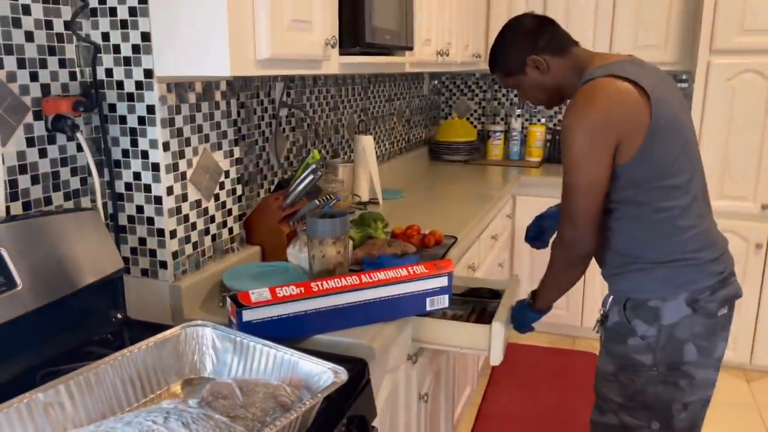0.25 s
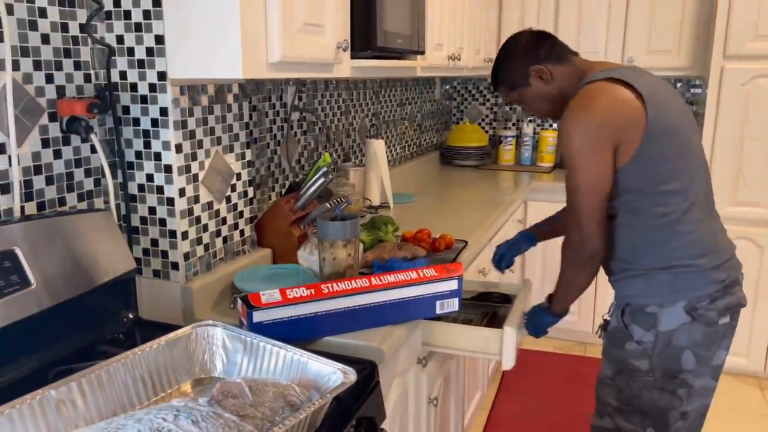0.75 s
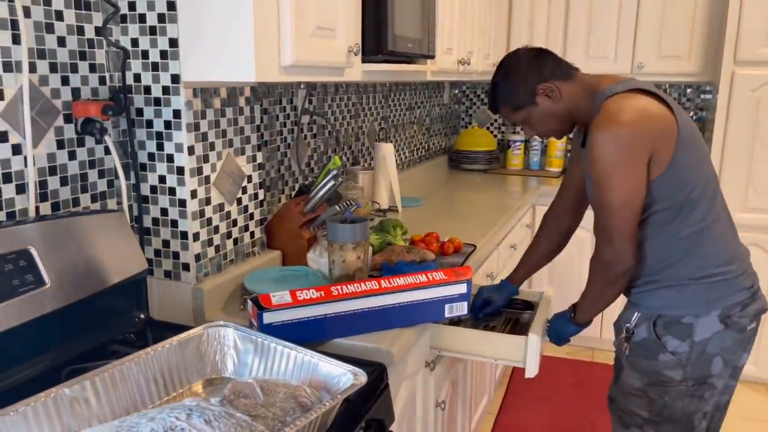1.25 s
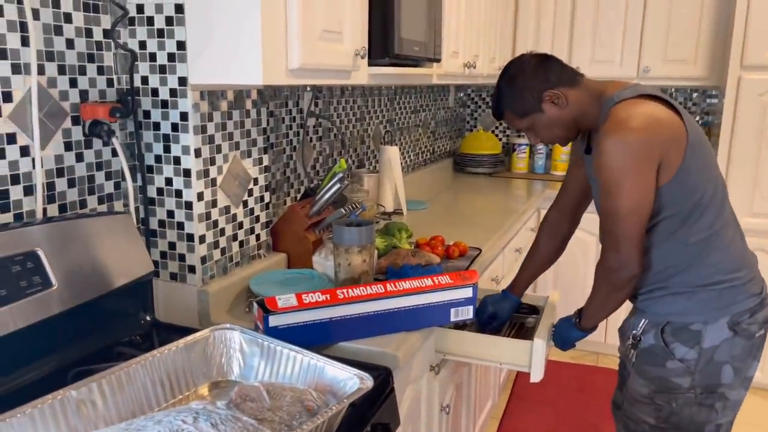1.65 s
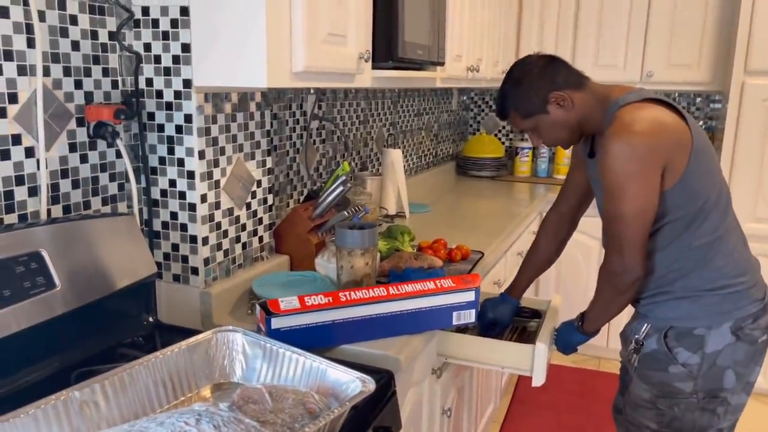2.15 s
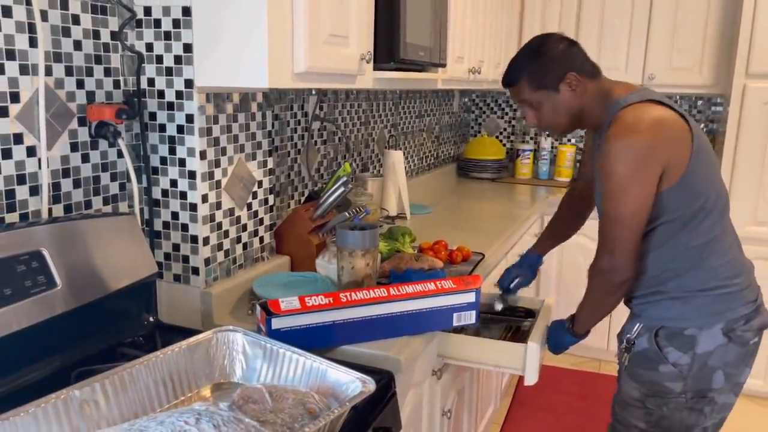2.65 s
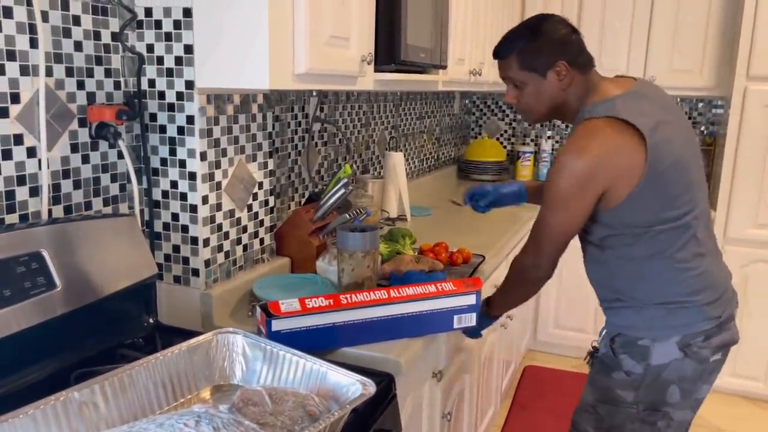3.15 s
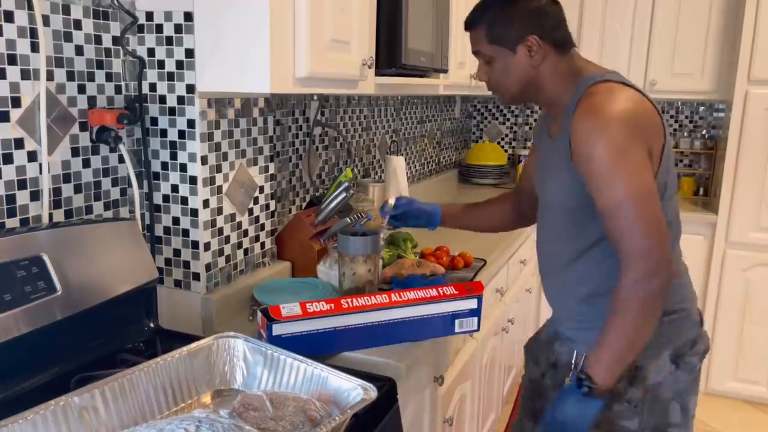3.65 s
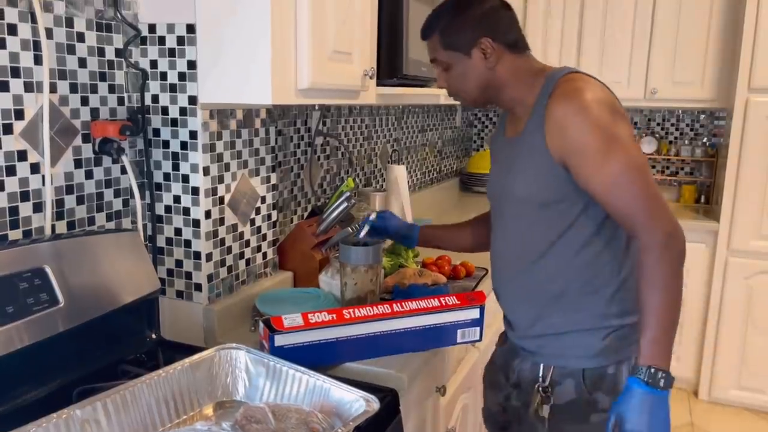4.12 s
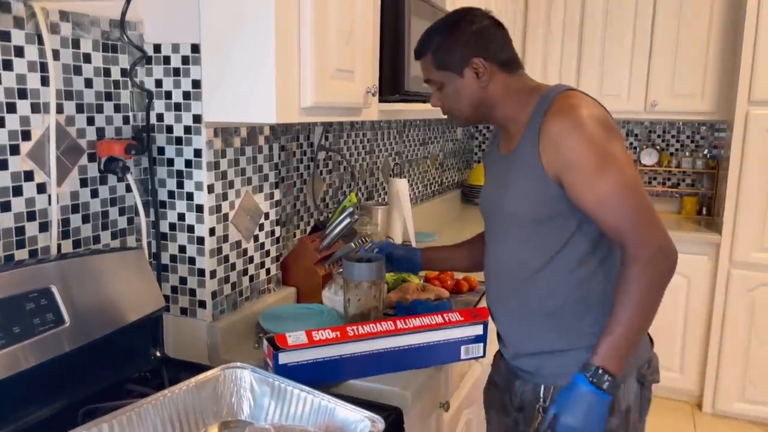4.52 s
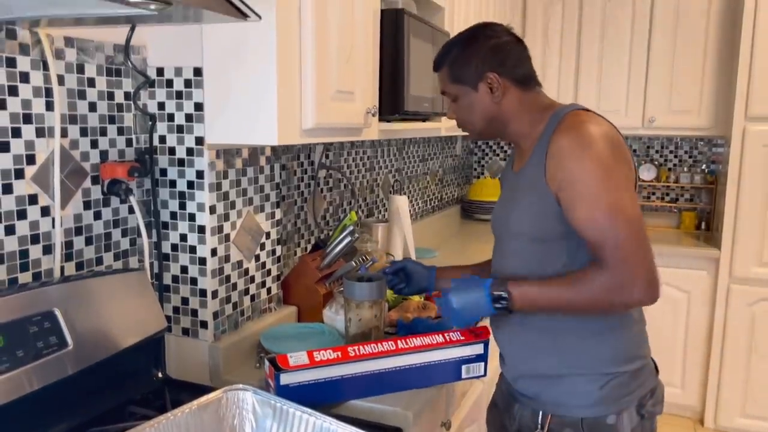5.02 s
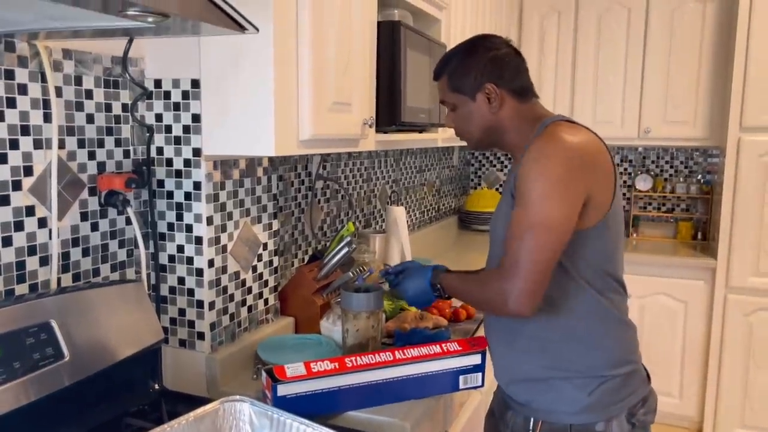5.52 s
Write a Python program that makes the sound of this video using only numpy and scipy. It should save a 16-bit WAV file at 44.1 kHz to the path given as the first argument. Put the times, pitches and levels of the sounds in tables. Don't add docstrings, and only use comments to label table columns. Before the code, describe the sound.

A small stereo microphone sits near a cutlery drawer in a hard, reflective kitchen, with a steady low refrigerator and fan hum throughout. From 0 to about 1 second the drawer rumbles in short shoves, with woody knocks and light, high steel jingles. It quiets until about 1.7 seconds, when small ticks resume; a distant engine faintly rises in pitch between 1.3 and 3.3 seconds. Jingling strengthens after 2 seconds, and around 2.4 a utensil is tugged from the pile with a bright, scraping clank that rings briefly. From 2.7 the drawer rolls again, slamming at 3.25 with a broad wooden bang and a short rattle of its contents. At 3.7 a spoon slaps the stone counter, ringing and chattering, then bounces at 3.8. Small ticks follow to 4.2. Soft cloth rustling continues, with dull low bumps near 4.7 and a faint sliding glove swish around 4.9 to 5.2, until the end.

```python
import sys
import numpy as np
from scipy import signal
from scipy.fft import rfft, irfft
from scipy.io import wavfile
from scipy.ndimage import uniform_filter1d

SR = 44100
rng = np.random.default_rng(int(sys.argv[2]) if len(sys.argv) > 2 else 0)


def bounce(signal):
    frames = np.transpose(np.atleast_2d(signal))
    limited = np.clip(frames, -1, 1)
    pcm = np.round(limited * 32767).astype(np.int16)
    wavfile.write(sys.argv[1], SR, pcm)


def volts_from_db(level):
    exponent = np.asarray(level, float) / 20
    return 10 ** exponent


N = 254888
HZ = np.maximum(np.fft.rfftfreq(N, 1 / SR), 1)
SECONDS = np.arange(N) / SR


def rms_one(x):
    return x / np.sqrt(np.mean(x ** 2) + 1e-20)


def in_time(rows):
    s, *columns = np.transpose(rows)
    return [np.interp(SECONDS, s, c, left=-120, right=-120) for c in columns]


def at_hz(points, hz):
    table_hz, values = np.transpose(points)
    return np.interp(np.log(hz), np.log(table_hz), values)


def colour(x, spectrum):
    cepstrum = irfft(np.log(volts_from_db(at_hz(spectrum, HZ))), N)
    cepstrum[1:N // 2] *= 2
    cepstrum[N // 2 + 1:] = 0
    return irfft(rfft(x) * np.exp(rfft(cepstrum)), N)


def alike_pair(length, likeness):
    mid, side = rfft(rng.standard_normal((2, length)))
    alike = np.clip(at_hz(likeness, np.fft.rfftfreq(length, 1 / SR) + 1), -1, 1)
    shared = np.sqrt(0.5 + alike / 2) * mid
    opposed = np.sqrt(0.5 - alike / 2) * side * [[1], [-1]]
    return irfft(shared + opposed, length)


def clicks_at(times, heights):
    out = np.full(N, 1e-18)
    np.add.at(out, (np.asarray(times) * SR).astype(int), heights)
    return out


def grains(per_s, spread_db):
    sizes = volts_from_db(spread_db * np.minimum(rng.exponential(1, N), 4)) * rng.choice([-1, 1], N)
    return sizes * (rng.random(N) < per_s / SR) + 1e-18


def ring(clicks, hz, t60):
    r = volts_from_db(-60 / (t60 * SR))
    w = 2 * np.pi * hz / SR
    return signal.lfilter([0, np.sin(w)], [1, -2 * r * np.cos(w), r * r], clicks)


def strike(hits, modes, scatter_db, contact_s):
    hits, out = np.array(hits), np.zeros(N)
    hardness = hits[:, 2] if hits.shape[1] > 2 else 0
    chance = rng.standard_normal((len(hits), len(modes)))
    first = int(hits[0, 0] * SR)
    span = slice(first - 1, first + SR)
    for k, (hz, level_db, t60) in enumerate(modes):
        blow_db = hits[:, 1] + level_db + scatter_db * chance[:, k] + hardness * np.log2(hz / 6000)
        blows = clicks_at(hits[:, 0], volts_from_db(blow_db))
        push = ring(blows[span], hz, contact_s * np.log(1000)) * 2 / (contact_s * SR)
        out[span] += ring(push, hz, t60)
    return out


def crack(hits, length_s):
    hits, n = np.array(hits), np.arange(1500)
    spray = rng.standard_normal(len(n)) * np.exp(-n / SR / length_s)
    return signal.fftconvolve(clicks_at(hits[:, 0], volts_from_db(hits[:, 1])), spray)[:N]


# f/Hz, correlation
LIKENESS = [(60, 0.93), (130, 0.92), (290, 0.34), (640, 0.16), (1400, 0.12), (3100, 0.64), (7000, 0.22),
            (10000, 0.92), (12000, 0.2)]
# f/Hz, level/dB per Hz
AIR = [(30, -28), (45, -3.5), (146, -12.5), (190, -11.5), (240, -16), (300, -16.5), (420, -22.5),
       (730, -26), (1200, -33), (2260, -35.5), (3300, -46.5), (6000, -48.5), (9000, -50.5), (12000, -49.5)]
# f/Hz, rms level/dB, width/Hz
HUM = [(46.5, -42, .3), (59.4, -53.5, 1.5), (95, -63, 0.42), (95, -54.5, 4.14), (179, -66, 0.76),
       (267.9, -59.5, 3.05), (272.5, -58, 3.8), (340, -71.5, 6.6), (424.5, -65.5, 4.1), (533, -73, 1.096),
       (800, -73, 1.2)]
# t/s, f/Hz, level/dB
ENGINE = [
    (1.2, 68, -87),
    (1.6, 69, -53.5),
    (2.2, 73.1, -50.5),
    (2.9, 77.1, -59),
    (3.4, 80, -67),
]


def machines():
    air = irfft(rfft(alike_pair(N, LIKENESS)) * volts_from_db(at_hz(AIR, HZ)), N)
    above_100_hz = irfft(rfft(air) * (HZ > 100), N)
    air *= volts_from_db(-47.5) / np.sqrt(np.mean(above_100_hz ** 2))
    peaks = sum(volts_from_db(level_db) / np.sqrt(np.pi * width / SR) / (1 + ((HZ - hz) / width) ** 2)
                for hz, level_db, width in HUM[1:])
    lines = irfft(rfft(rng.standard_normal(N)) * peaks, N)
    compressor_hz, compressor_db = HUM[0][:2]
    compressor = volts_from_db(compressor_db) * np.sqrt(2) * np.sin(2 * np.pi * compressor_hz * SECONDS)
    hz, level_db = in_time(ENGINE)
    turns = 2 * np.pi * np.cumsum(hz) / SR
    engine = volts_from_db(level_db) * (np.sin(2 * turns) + 0.7 * np.sin(3 * turns))
    return air + lines + compressor + engine


# t/s, level/dB
RUSTLE = [(0, -88), (3.9, -59), (4.2, -60), (4.6, -61.5), (4.8, -59), (5.1, -60), (5.4, -61.5),
          (5.78, -62.5)]
# f/Hz, level/dB per Hz
CLOTH = [(500, -20), (1000, -13), (1800, 4.5), (2500, -3), (3500, -7), (6000, -6.5), (9000, -5.5),
         (11500, -8)]


def rustle():
    return volts_from_db(in_time(RUSTLE)[0]) * rms_one(colour(alike_pair(N, LIKENESS), CLOTH))


# t/s, swell/s, hold/s, wood rumble level/dB, cutlery jingle level/dB
SHOVES = [(0.028, 0.12, 0, -39.5, -39.5), (0.183, .025, 0.0024, -48, -69), (.334, 0.0034, .0, -51.5, -46),
          (0.37, 0.032, 0.024, -50.5, -76), (0.48, 0.054, 0.11, -57, -52.5),
          (0.606, 0.054, 0.057, -47.5, -37), (0.742, .05, 0.024, -55, -45.5), (0.89, 0.21, 0.11, -48, -40),
          (1.688, 0.013, .0, -73, -49), (1.71, 0.0067, 0.039, -56.5, -75), (1.908, .01, 0.02, -58, -48.5),
          (1.989, 0.16, 0.018, -48.5, -40.5), (2.191, 0.15, 0.021, -53, -44),
          (2.299, 0.056, .09, -45.5, -32), (2.398, 0.038, 0.03, -40.5, -23.5),
          (2.655, 0.063, .02, -49.5, -93), (2.8, 0.21, 0.068, -49, -48.5), (2.949, 0.11, 0.075, -44, -43.5),
          (3.043, 0.071, 0.032, -40, -49), (3.228, 0.041, .005, -51, -59)]


def effort(level_db, fall_db_per_s):
    s, swell, hold = np.transpose(SHOVES)[:3, :, None]
    coarse = SECONDS[::16]
    rising = 30.5 * (s - coarse) / np.maximum(swell, 1e-3)
    falling = fall_db_per_s * (coarse - s - np.maximum(hold, 0))
    under_db = np.clip(np.maximum(rising, falling), 0, 200)
    power = np.sum(volts_from_db(level_db[:, None] - under_db) ** 2, axis=0)
    return np.interp(SECONDS, coarse, np.sqrt(power))


# f/Hz, level/dB per Hz
RUMBLE = [(88, -12.5), (150, -6), (391, -0.5), (457, -11), (643, -7.5), (1320, -9.5), (1570, -8),
          (3330, -21.5), (9000, -27), (11700, -30.5), (19800, -120)]
# f/Hz, level/dB per Hz
JINGLE = [(1500, -35.5), (2500, -13.5), (6800, -15.5), (8900, -5), (10300, -1), (11500, -3.5),
          (13000, -6.5), (15000, -13)]


def drawer():
    wood_db, steel_db = np.transpose(SHOVES)[3:]
    rumble = rms_one(colour(grains(2500, spread_db=0.0), RUMBLE))
    touches = grains(1500, spread_db=1.5)
    dealt = rng.integers(0, 40, N)
    pitches = np.geomspace(4000, 15000, 40) * volts_from_db(0.1785 * rng.standard_normal(40))
    steel = sum(ring(touches * (dealt == k) + 1e-18, hz, t60=0.04) for k, hz in enumerate(pitches))
    jingle = rms_one(colour(rms_one(steel) + 1.27 * rms_one(touches), JINGLE))
    rolling = effort(wood_db + 1, fall_db_per_s=146.5) * rumble
    return rolling + effort(steel_db - 6.0, fall_db_per_s=225) * jingle


# t/s, peak level/dB, f/Hz
WOOD_KNOCKS = [(0.022, -27.5, 1543), (.03, -39, 890), (.05, -30, 285), (.12, -45, 1980), (0.191, -39, 1320),
               (.201, -39, 995), (0.368, -45, 1590), (0.547, -44, 1480), (.595, -41, 1440),
               (0.749, -46, 1160), (.968, -50, 1800), (.888, -37.5, 2050), (1.716, -48.5, 1870),
               (1.952, -48.5, 1820), (1.995, -44, 1220), (2.337, -37, 826), (2.363, -38, 850),
               (2.399, -34.5, 2110), (2.404, -34, 1140), (2.428, -30.5, 1220), (2.453, -34, 2105),
               (2.66, -42.5, 875), (2.954, -58, 1610), (3.056, -38.5, 1550), (3.262, -18.5, 267),
               (4.33, -54, 2540), (4.667, -45.5, 613), (4.669, -36.5, 185), (4.686, -35, 328),
               (4.781, -38, 340), (4.805, -53, 2110)]
# t/s, peak level/dB, f/Hz
STEEL_TICKS = [(0.336, -39, 7030), (0.588, -48, 8800), (.607, -45, 11500), (.62, -40, 8900),
               (.64, -37, 7400), (.635, -35, 15400), (0.705, -40.5, 4470), (0.703, -43, 3860),
               (.706, -34.5, 8860), (.707, -43, 6950), (1.679, -60, 9100), (1.68, -50, 11100),
               (1.95, -44, 11100), (1.994, -58, 9100), (1.996, -49, 5330), (2.182, -37.5, 9200),
               (2.399, -13.5, 9250), (2.798, -50, 8420), (3.808, -22, 5780), (3.833, -27, 11300),
               (3.890, -42, 11300), (3.926, -27.5, 2290), (3.951, -34.5, 8930), (4.157, -34, 15200),
               (4.156, -46, 10840), (4.158, -34, 12900)]
# t/s, peak level/dB, f/Hz
FREE_RINGS = [(.925, -43, 15000), (.96, -42, 14700), (1.68, -52, 14800), (1.95, -48, 14850),
              (1.995, -47, 14850), (2.182, -45, 14850), (2.295, -36, 14800), (2.296, -39, 8830),
              (2.296, -31.5, 11200), (2.336, -23.5, 11000), (3.83, -35, 14900), (2.385, -39.5, 335),
              (2.404, -33.5, 319.6), (3.44, -37.5, 95), (3.38, -32.5, 14430), (3.806, -31, 7770),
              (3.927, -46, 2280)]
KINDS = [
    (.04, 3.2, .45),
    (.03, 1.6, 0.29),
    (.006, 1.4, .06),
]


def knocks():
    out = np.zeros(N)
    wood, steel, free = KINDS
    slope = -0.15
    rows = [(*row, 0.064 * (row[2] / 1000) ** slope, *wood) for row in WOOD_KNOCKS]
    rows += [(*row, 0.038, *steel) for row in STEEL_TICKS]
    rows += [(*row, 0.2 * (row[2] / 1000) ** slope, *free) for row in FREE_RINGS]
    t = SECONDS[:12000]
    for s, level_db, hz, t60, spread, top, share in rows:
        start = int(s * SR)
        detune = 1 + spread * rng.standard_normal(3) * [0, 1, 1]
        cluster = np.sin(2 * np.pi * hz * np.outer(detune, t)).T @ [1, 0.6, 0.6]
        edges_hz = [hz / 1.4, np.clip(hz * top, hz, 0.45 * SR)]
        band = signal.butter(2, edges_hz, "band", fs=SR, output="sos")
        tick = signal.sosfilt(band, rng.standard_normal(len(t))) * np.exp(-t / 0.012)
        out[start:start + len(t)] += volts_from_db(level_db) * (cluster * volts_from_db(-60 * t / t60) / 2 + share * tick)
    return out


# t/s, level/dB, hardness/dB per octave
CLANK = [
    (2.397, -35, 13),
    (2.404, -41, 1),
    (2.412, -30, 5.5),
    (2.422, -27, -10.5),
    (2.432, -30.5, -10),
    (2.444, -36.5, 0.5),
    (2.458, -37.5, -0.5),
    (2.476, -44, 3),
]
# f/Hz, level/dB, t60/s
PILE = [(3854, -18, .14), (5265, -7, 0.25), (7980, -8, 0.25), (8400, -30, 0.11), (9250, -19, 0.037),
        (9980, -4.5, .28), (10770, -5.5, 0.27), (11130, 7, 0.05), (11250, -12.5, 0.17), (11500, -15, 0.072),
        (12000, -12, 0.14), (12240, -12, .1), (12600, -11, .12), (12760, -10, .12), (13060, -4, .075),
        (14250, 6, 0.082), (14400, -3, 0.15), (14900, -1, .11)]


def clank():
    ringing = strike(CLANK, PILE, scatter_db=6.0, contact_s=0.0031)
    return ringing + volts_from_db(-17.5) * colour(crack(CLANK, length_s=0.008), JINGLE)


# t/s, level/dB
BANG = [
    (3.2468, -17.5),
    (3.248, -8.5),
    (3.2503, -7.5),
    (3.257, -21),
    (3.265, -22),
    (3.285, -24),
    (3.302, -20.5),
    (3.33, -28.5),
    (3.362, -26.5),
    (3.404, -32.5),
]
# f/Hz, level/dB per Hz
CABINET = [(29, -30.5), (50, -11), (190, -10.5), (260, -7.5), (400, -4), (600, -6), (850, -8), (1340, -8),
           (2220, -10), (2860, -12.5), (4000, -17.5), (8770, -20), (10100, -12.5), (11800, -21.5),
           (13000, -31), (14500, -45), (22000, -120)]
# f/Hz, level/dB, t60/s
PANELS = [(62.5, -22, 0.37), (135, -33, 0.35), (251, -47, .14), (294, -40.5, 0.15), (352, -38.5, 0.35),
          (392, -36, 0.096), (443, -36.5, 0.065), (518, -37.5, .2), (750, -36, 0.11), (922, -38, 0.18),
          (1298, -32, .15), (1385, -34.5, .15), (1498, -32, 0.118), (1924, -26.5, .1), (2340, -32.5, .1),
          (2810, -36, .07), (3650, -35, 0.0785), (4000, -31.5, 0.059), (4657, -42.5, .08)]


def bang():
    since = SECONDS - BANG[0][0]
    after = (since > 0) * np.exp(-np.maximum(since, 0) / 0.071)
    rattle = volts_from_db(-22) * after * rms_one(grains(3000, spread_db=-0.5))
    broad = colour(crack(BANG, length_s=0.0019) + rattle, CABINET)
    return volts_from_db(16.0) * broad + volts_from_db(5.5) * strike(BANG, PANELS, scatter_db=3.5, contact_s=0.00069)


# t/s, level/dB, hardness/dB per octave
BOUNCES = [
    (3.6945, -18, -4),
    (3.700, -12, 1),
    (3.709, -25, 6.5),
    (3.718, -36, 7.5),
    (3.8045, -18, -1),
]
# f/Hz, level/dB, t60/s
SPOON = [(2180, -14, 0.056), (2286, -18.5, 0.42), (2290, -33, 0.11), (2340, -20, 0.12), (2420, -27, .05),
         (2870, -24, 0.084), (2935, -25.5, 0.1003), (3550, -33.5, 0.0976), (4076, -20, 0.061),
         (4680, -33.5, .12), (5390, -25, 0.17), (5460, -29.5, .15), (5715, -18.5, 0.074),
         (6260, -22, 0.087), (6520, -28.5, .14), (8040, -27, .2), (8420, -12.5, 0.12), (8450, -19, 0.1),
         (8800, -15, .04), (9160, -8.5, .09), (9350, -31, 0.2), (9500, -16.5, .08), (9800, -12, 0.059),
         (11100, -16, .08), (11000, -32, .14), (11160, -14.5, .07), (11300, -7.5, .19), (11345, -8, .16),
         (10980, -9, .05), (11810, -16, .08), (11930, -23, .2), (12270, -22, .08), (12700, -16, .07),
         (12370, -11, .06), (14400, -18, .08), (14660, -9, .14), (15200, -20, .03)]
# f/Hz, level/dB per Hz
COUNTER = [(100, -31.5), (340, -6.5), (700, -4.5), (1500, -12), (2300, -8), (4000, -17.5), (6000, -11),
           (9000, 3.5), (12000, 4.5)]


def spoon():
    ringing = strike(BOUNCES, SPOON, scatter_db=5.0, contact_s=0.00082)
    return ringing + volts_from_db(-4) * colour(crack(BOUNCES, length_s=0.0081), COUNTER)


# t/s, f/Hz, level/dB
SWISH = [
    (4.9, 9530, -60.5),
    (4.96, 9200, -58),
    (5.05, 7560, -65),
    (5.1, 5940, -61),
    (5.18, 5800, -68),
    (5.28, 5580, -84),
]


def swish():
    hz, level_db = in_time(SWISH)
    lowpass = signal.butter(2, 550, fs=SR, output="sos")
    rough = signal.sosfilt(lowpass, rng.standard_normal((2, N)))
    phase = 2 * np.pi * np.cumsum(hz) / SR
    return volts_from_db(level_db) * rms_one(rough[0] * np.cos(phase) + rough[1] * np.sin(phase))


# f/Hz, correlation
REFLECTED = [(60, 1), (130, 0.92), (400, 0.47), (1000, .1), (3000, 0.27), (6500, 0.2), (8000, 0.58),
             (10300, 1), (12500, 0.4)]
# f/Hz, t60/s
DECAY = [(60, 1), (260, 0.62), (700, 0.58), (1800, 0.47), (5000, 0.49), (12000, 0.38), (14500, 0.26)]


def kitchen(x):
    hz, t, cells = signal.stft(alike_pair(SR, REFLECTED), SR, nperseg=256)
    fading = cells * volts_from_db(-60 * t / at_hz(DECAY, hz + 1)[:, None])
    tail = signal.istft(fading, SR, nperseg=256)[1]
    tail = tail * np.clip((np.arange(tail.shape[1]) / SR - 0.003) / 0.0057, 0, 1)
    return signal.fftconvolve(x[None], tail / np.sqrt(np.sum(tail ** 2) / 2), axes=1)[:, :N]


def scene():
    inside = drawer() + knocks() + clank() + bang()
    ringing = spoon()
    wet = kitchen(volts_from_db(-2.5) * inside + volts_from_db(-2.0) * ringing + volts_from_db(1.5) * swish())
    return inside + ringing + wet + rustle() + machines()


# f/Hz, level/dB
KEPT = [(7500, -120), (9500, -106), (10300, -100), (11300, -101), (11900, -79.5), (12500, -89),
        (13200, -82), (14000, -77.5), (14800, -86), (15400, -74.5), (16000, -81)]
# f/Hz, level/dB
MASK = [(9900, -57.5), (10200, -20.5), (10600, -31), (12500, -36.5), (14000, -42), (16000, -44.5)]


def drop_faint_treble(left, right):
    hz, _, cells = signal.stft([left + right, left - right], SR, nperseg=2048)
    power = uniform_filter1d(np.abs(cells / 2) ** 2, size=8, axis=1)
    power = power[:, 4::8].repeat(8, axis=1)
    power = np.pad(power, ((0, 0), (0, 1), (0, 0)))
    loudest = power[:, hz > 7000].max(axis=(0, 1))
    masked = volts_from_db(at_hz(MASK, hz + 1))[:, None] ** 2 * loudest
    faint = volts_from_db(at_hz(KEPT, hz + 1))[:, None] ** 2
    kept = power > np.maximum(masked, faint)
    mid, side = signal.istft(cells * kept, SR, nperseg=2048)[1][:, :N] / 2
    return np.array([mid + side, mid - side])


def low_pass(x):
    return signal.sosfilt(signal.butter(12, 16510, fs=SR, output="sos"), x)


# f/Hz, level/dB
PORT_BALANCE = [(60, 0.5), (300, 1.5), (800, 2), (3500, 2.5), (8000, 2.5), (14000, -2.3)]
# f/Hz, phase/rad
PORT_PHASE = [(100, 0), (1800, -.2), (2800, .6), (6200, .4), (7000, .1), (7600, .8), (8270, .2),
              (8960, -.9), (9650, -2.3), (10330, -3.3), (11020, -4.5), (11700, -5.8), (12400, -6.28),
              (13400, -6.6), (13900, -9.4), (14500, -10.6), (15100, -12.4), (16000, -12.6)]
# f/Hz, level/dB
MIC = [(1000, -0.27), (11500, 0.3), (12500, -12), (13200, -22), (13700, -21.5), (14300, -20),
       (14900, -14.5), (15600, -9.5), (16400, -56)]


def record(dry):
    apart = volts_from_db(at_hz(PORT_BALANCE, HZ) / 2) * np.exp(0.5j * at_hz(PORT_PHASE, HZ))
    ports = irfft(rfft(dry) * [apart, 1 / apart], N)
    softened = 0.6 * np.tanh(ports / 0.6)
    ports = colour(softened, MIC)
    bass_cut = signal.cheby2(8, 45, 33, "high", fs=SR, output="sos")
    mix = drop_faint_treble(*signal.sosfilt(bass_cut, ports))
    return low_pass(mix)


dry = scene()
out = record(dry)
bounce(out)
```